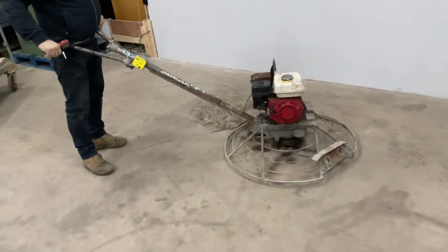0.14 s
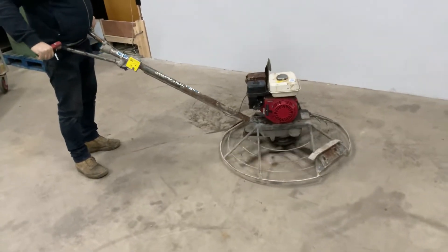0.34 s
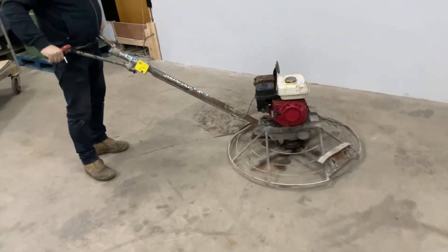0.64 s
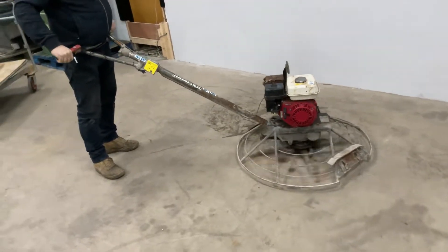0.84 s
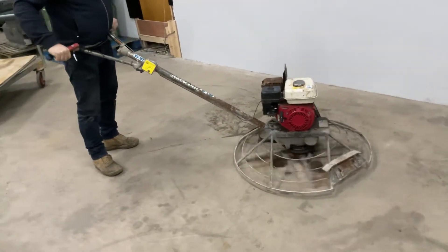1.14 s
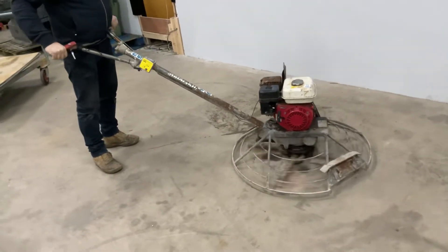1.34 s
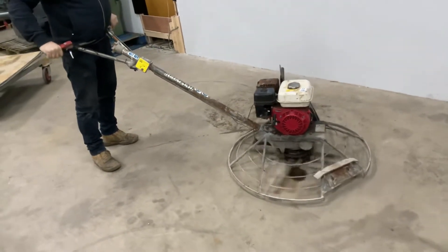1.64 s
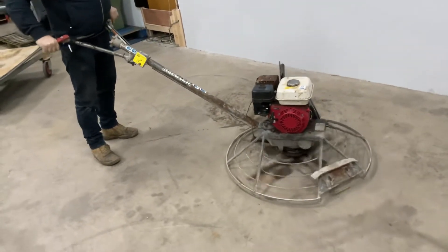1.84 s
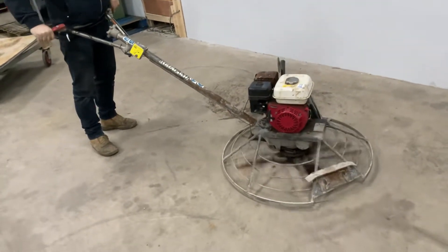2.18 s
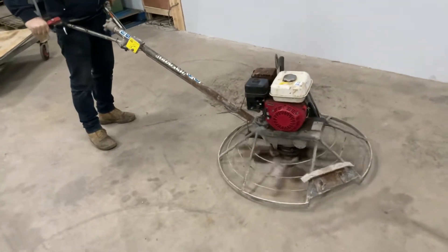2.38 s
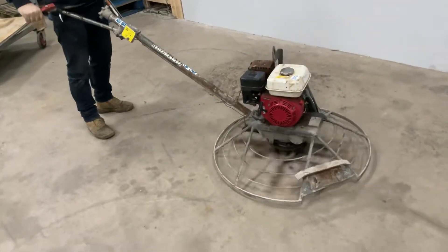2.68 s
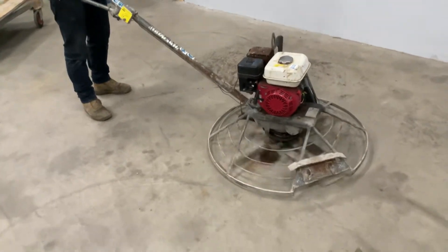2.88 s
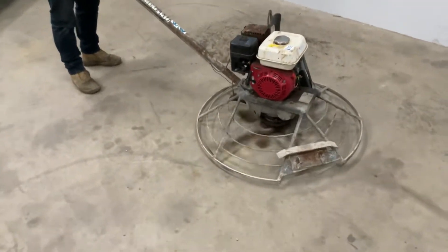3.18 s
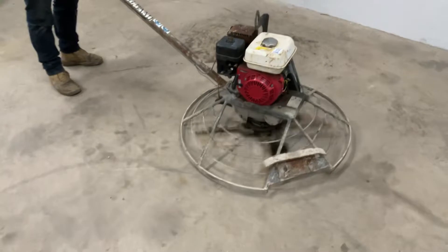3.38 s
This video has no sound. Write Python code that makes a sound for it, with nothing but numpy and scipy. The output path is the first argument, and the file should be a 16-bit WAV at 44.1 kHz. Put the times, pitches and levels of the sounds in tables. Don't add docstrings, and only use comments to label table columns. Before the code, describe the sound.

A loud small petrol engine drives a concrete troweling machine in a bare, reverberant hall. Its rapid exhaust beats, about 22 per second, blend into a rough, steady drone with light valve clatter and fan roar. Steel blades scrape the slab as continuous gritty hiss, pulsing faintly near 1.9 seconds. From about 2 seconds the microphone comes close: slightly louder, brighter and fuller, still running at the 3.5-second cut.

```python
import sys
import numpy as np
from scipy import signal
from scipy.fft import rfft, irfft
from scipy.io import wavfile
from scipy.ndimage import uniform_filter1d

SR = 44100
rng = np.random.default_rng(int(sys.argv[2]) if len(sys.argv) > 2 else 0)


def wrap_up_sound(samples):
    columns = np.atleast_2d(samples).T
    tamed = np.clip(columns, -1, 1)
    steps = np.round(tamed * 32767).astype(np.int16)
    wavfile.write(sys.argv[1], SR, steps)


def to_linear_factor(level_db):
    exponent = np.asarray(level_db, float) / 20
    return 10 ** exponent


N = 155232

# time_s, firing_rate_hz
SPEED = [
    (0, 22.24),
    (0.9, 21.927),
    (1.8, 22.286),
    (2.7, 22.272),
    (3.52, 22.581),
]
# order (multiple of firing rate), level_db
FAR_ORDERS = [(1, -27), (2, -30), (3, -9), (4, -28), (5, -0.5), (6, -13.5), (7, -3), (8, -43), (9, -7),
              (10, -8), (11, -22), (12, -10), (13, -18.5), (14, -0.5), (15, -18.5), (16, 0), (17, -14),
              (18, -32), (19, -17), (20, -19), (21, -23), (22, -28.5)]
# order (multiple of firing rate), level_db
MID_ORDERS = [(1, -40), (2, -29), (3, -9.5), (4, -16), (5, 0), (6, -2), (7, 0), (8, -16), (9, -5.5),
              (10, -17), (11, -13.5), (12, -6.5), (13, -8), (14, -11), (15, -17), (16, -10), (17, -18.5),
              (18, -11), (19, -11.5), (20, -17), (21, -36), (22, -6)]
# order (multiple of firing rate), level_db
NEAR_ORDERS = [(1, -49), (2, -36), (3, -26), (4, -16), (5, -3), (6, 2), (7, -9.5), (8, -5), (9, -34),
               (10, -1), (11, -21), (12, -11.5), (13, -18), (14, -16), (15, -42), (16, -15.5), (17, -24),
               (18, -34), (19, -10), (20, -23), (21, -43), (22, -40)]
# time_s, closeness (0-1)
WALK = [
    (0, 0.06),
    (.5, 0.18),
    (1.1, 0.32),
    (1.7, 0.29),
    (2.3, 0.7),
    (2.9, 0.86),
    (3.52, 0.95),
]
# time_s, level_db
PRESS = [
    (0, -15),
    (.6, -15.5),
    (1.2, -15),
    (1.55, -14.5),
    (1.9, -15),
    (2.4, -14),
    (3.0, -13.5),
    (3.52, -13.6),
]
# time_s, swell_db
THROB = [
    (0, 0.3),
    (.9, 0.2),
    (1.45, 0.3),
    (1.85, 1.2),
    (2.25, .3),
    (3.52, 0),
]
# frequency_hz, density_db (per Hz)
FAR_SCRAPE = [(760, -34), (1300, -12), (1750, 5), (3200, -1.5), (5000, 0.5), (7600, -3.5), (10600, -4.5),
              (15400, -19.5)]
# frequency_hz, density_db (per Hz)
NEAR_SCRAPE = [(760, -36), (1300, 2.5), (2400, 1), (5000, 2), (7600, 1), (10400, -1), (12500, -6),
               (15400, -12.5)]
# frequency_hz, width_hz, far_db, near_db
RINGS = [(3430, 650, -35, -63), (5370, 1000, -53.5, -35.5), (9020, 2300, -34, -34), (2410, 240, -61, -37)]
# frequency_hz, width_hz, far_db, near_db
CASING = [(633.6, 57, -37, -41.5), (736.4, 11, -44, -51), (1043, 117, -37, -39), (1207, 190, -46, -35.5),
          (857, 36, -43, -55)]
# frequency_hz, density_db
ROAR = [(20, -48), (60, -38), (130, -22), (220, -13), (400, -14.5), (550, -6), (1000, -2.5), (2200, 4)]
# time_s, low_hz, high_hz
SWAPS = [
    (.255, 8300, 10350),
    (.255, 13100, 15700),
    (1.485, 9650, 11050),
    (1.695, 4150, 5200),
    (2.02, 4650, 5700),
    (2.62, 8300, 10350),
    (2.69, 12400, 14500),
    (3.295, 6900, 8300),
    (3.435, 6900, 8300),
    (3.435, 5150, 6250),
]


def exhaust(t, turns, near):
    places = ((-29.5, FAR_ORDERS), (-28, MID_ORDERS), (-24.5, NEAR_ORDERS))
    levels = np.array([np.array(rows)[:, 1] for _, rows in places], float)
    for row, (total_db, _) in zip(levels, places):
        row += total_db - 10 * np.log10((to_linear_factor(row) ** 2).sum() / 2)
    shape_rad = 6.2 + (4.3 - 6.2) * near
    coarse = t[::128]
    beats = np.zeros(N)
    for order, column in enumerate(levels.T, start=1):
        loose = 1 / (1 + (10 / order) ** 4)
        waver_db = 1.9 * np.interp(t, coarse, loose * slow(3.02, coarse))
        waver_rad = .4 * np.interp(t, coarse, loose * slow(3.02, coarse))
        level_db = np.interp(near, [0, .3, 1], column) + waver_db + hollow_db(order * SPEED[0][1], t)
        scatter_rad = .75 + (.15 - .75) * near + np.pi * (order > 8.5)
        scatter = rng.uniform(-1.01, 1) * scatter_rad
        lead_rad = .3 * min(order - 6, 0) ** 2
        phase = 2 * np.pi * order * turns - shape_rad + scatter - lead_rad + waver_rad
        beats += to_linear_factor(level_db) * np.cos(phase)
    firing_db = .5 * np.interp(turns, np.arange(100), rng.standard_normal(100))
    return beats * to_linear_factor(firing_db)


def blades(t, near):
    blades_hz, blade_turn = 6.5, .45
    grit_per_s, grit_spread_db, grit_db = 4500, 4, -8.5
    struck = rng.random(N) < grit_per_s / SR
    force = to_linear_factor(grit_spread_db * np.minimum(rng.exponential(1, N), 5))
    grit = force * struck * rng.choice([-1., 1.], N)
    rub = evened(rng.standard_normal(N) + to_linear_factor(grit_db) * evened(grit))

    def field_db(hz, s):
        close = curve(WALK, 1, s)
        low_cut = 12 * np.log2(1 + (1500 / (hz + 1)) ** 3)
        swell = curve(THROB, 1, s) * np.cos(2 * np.pi * (blades_hz * s + blade_turn))
        jolts = uniform_filter1d(rng.standard_normal(len(s)), size=3)
        flicker_db = .6 * evened(jolts - uniform_filter1d(jolts, size=20))
        tilt = 1 + .46 * np.log2((hz + 500) / 6000)
        far_db = np.outer(read(FAR_SCRAPE, hz) - low_cut, 1 - close)
        near_db = np.outer(read(NEAR_SCRAPE, hz) - low_cut, close)
        return np.outer(tilt, swell + flicker_db) + far_db + near_db

    hiss = colour(rub, field_db, 1.04)
    hiss = hiss / np.sqrt(uniform_filter1d(hiss ** 2, size=SR))
    level_db = curve(PRESS, 1, t)
    rings = np.zeros(N)
    for hz, width, far, close in RINGS:
        ring_db = far + (close - far) * near - level_db.mean() + .87 * slow(2.7, t)
        rings += to_linear_factor(ring_db) * resonate(rub, hz, max(width, hz / 12))
    return to_linear_factor(level_db) * (to_linear_factor(-.7) * hiss + rings)


def rattle(turns):
    crank = 2 * (turns - .62) + 10
    index = crank.astype(int)
    weak_db, spread_db, decay_turns = -3, 2, .142
    size = to_linear_factor(weak_db * (index % 2) + spread_db * rng.standard_normal(400)[index])
    clack = size * np.exp(-(crank % 1) / decay_turns) * rng.standard_normal(N)
    return to_linear_factor(-31) * hall(resonate(clack, 3600, 6800))


def roar(t, near):
    def field_db(hz, s):
        high_cut = 12 * np.log2(1 + (hz / 1900) ** 3)
        return (read(ROAR, hz) - high_cut)[:, None] + hollow_db(hz[:, None], s)

    wash = colour(rng.standard_normal(N), field_db, 1.43)
    casing = np.zeros(N)
    for hz, width, far, close in CASING:
        mode_db = far + (close - far) * near + 1.5 * slow(3.82, t)
        casing += to_linear_factor(mode_db) * resonate(rng.standard_normal(N), hz, width)
    return to_linear_factor(-26.5) * evened(wash) + casing


def hall(x):
    t60_s, echo_db = .7, -2
    t = np.arange(SR) / SR
    sparse = rng.choice([-1., 1.], SR) * (rng.random(SR) < .05)
    taps = sparse * to_linear_factor(-60 * t / t60_s) * (t > .008)
    echoes = signal.fftconvolve(x, taps / np.linalg.norm(taps))[:N]
    return x + to_linear_factor(echo_db) * echoes


def hollow_db(hz, t):
    node_s, crossing_s, node_hz, dip_db = 2.2, .8, 382, -2.5
    crossing = np.exp(-((t - node_s) / crossing_s) ** 2)
    return dip_db * crossing * np.exp(-np.log2((hz + 1) / node_hz) ** 2)


def colour(x, field_db, patch_db):
    hz, t, z = signal.stft(x, SR, nperseg=1024, noverlap=768)
    patches = uniform_filter1d(rng.standard_normal(z.shape), size=20, axis=0)
    patches = evened(uniform_filter1d(patches, size=7, axis=1))
    shaped = z * to_linear_factor(field_db(hz, t) + patch_db * patches)
    return signal.istft(shaped, SR, nperseg=1024, noverlap=768)[1][:N]


def resonate(x, hz, width):
    r = np.exp(-np.pi * width / SR)
    a = [1, -2 * r * np.cos(2 * np.pi * hz / SR), r * r]
    once = signal.lfilter([1, 0, -1], a, x)
    return evened(signal.lfilter([1], a, once))


def slow(top_hz, t):
    s = np.linspace(t[0], t[-1], num=800)
    drift = np.zeros(800)
    for f in top_hz * np.geomspace(.1, 1, 12):
        drift += np.sin(2 * np.pi * (f * s + rng.random())) / np.sqrt(f)
    return evened(np.interp(t, s, drift))


def evened(x):
    return x / np.sqrt(np.mean(x ** 2) + 1e-20)


def read(points, hz):
    f, value = np.transpose(points)
    return np.interp(np.log(hz + 1), np.log(f + 1), value)


def curve(table, col, t):
    table = np.array(table)
    return np.interp(t, table[:, 0], table[:, col])


def scene():
    t = np.arange(N) / SR
    turns = -.02 + np.cumsum(curve(SPEED, 1, t)) / SR
    near = curve(WALK, 1, t)
    mono = exhaust(t, turns, near) + blades(t, near) + rattle(turns) + roar(t, near)
    return np.array([mono, mono])


def low_pass(x):
    return signal.sosfilt(signal.butter(12, 16270, fs=SR, output="sos"), x)


def record(dry):
    frame, repeat_s, fade_s, ceiling = 1024, 3.427, .001, 1.25
    t = np.arange(N) / SR
    late = np.clip((t - repeat_s) / fade_s, 0, 1)
    mid = dry[0] * np.sqrt(1 - late) + np.roll(dry[0], frame) * np.sqrt(late)
    mid = ceiling * np.tanh(mid / ceiling)
    hz, spectrum = np.fft.rfftfreq(N, 1 / SR), rfft(mid)
    side = np.zeros(N)
    for s, lo, hi in SWAPS:
        window = np.sin(np.pi / 2 * np.clip(1.3 - 2 * abs(t - s) * SR / frame, 0, 1))
        band = irfft(spectrum * (hz > lo) * (hz < hi), N)
        side += window * np.roll(band, 5 * frame)
    mid = irfft(spectrum * (hz < 15740), N)
    side = to_linear_factor(-2.5) * side
    return low_pass(np.array([mid + side, mid - side]))


dry = scene()
out = record(dry)
wrap_up_sound(out)
```